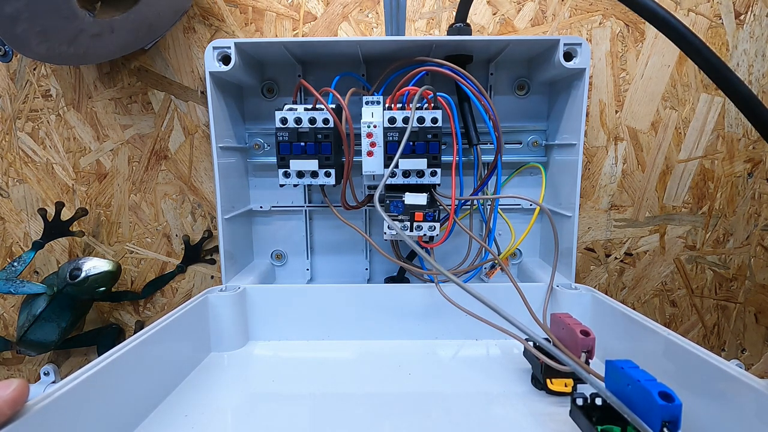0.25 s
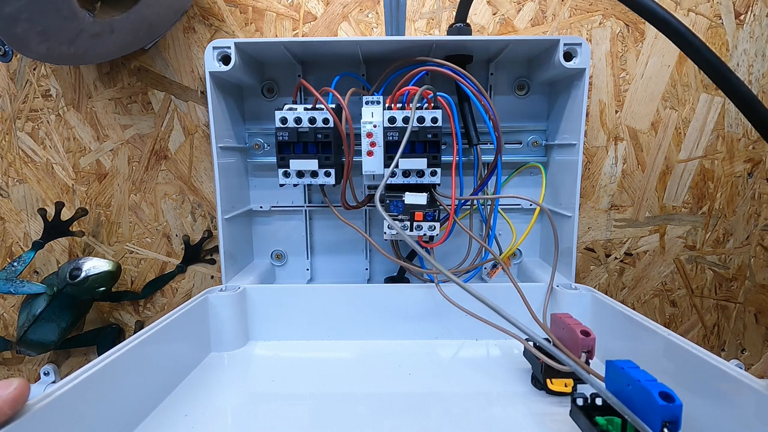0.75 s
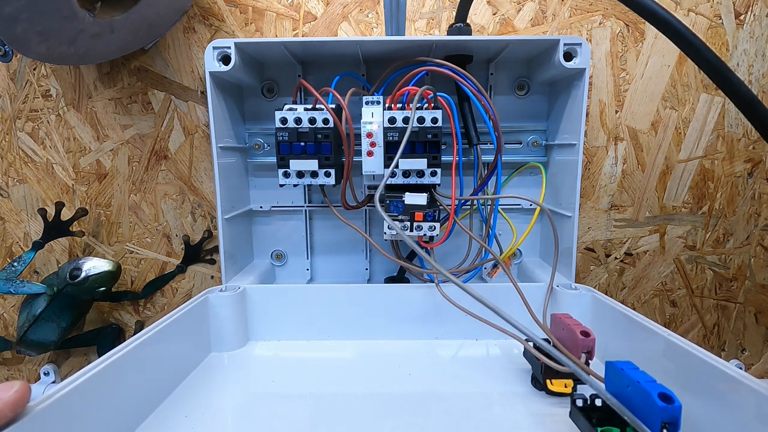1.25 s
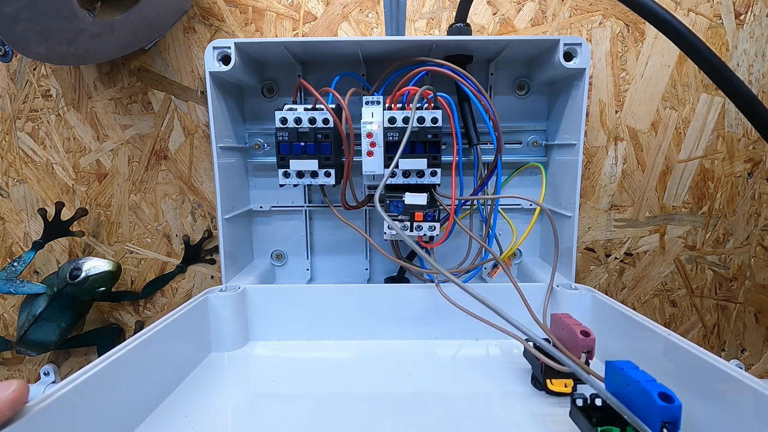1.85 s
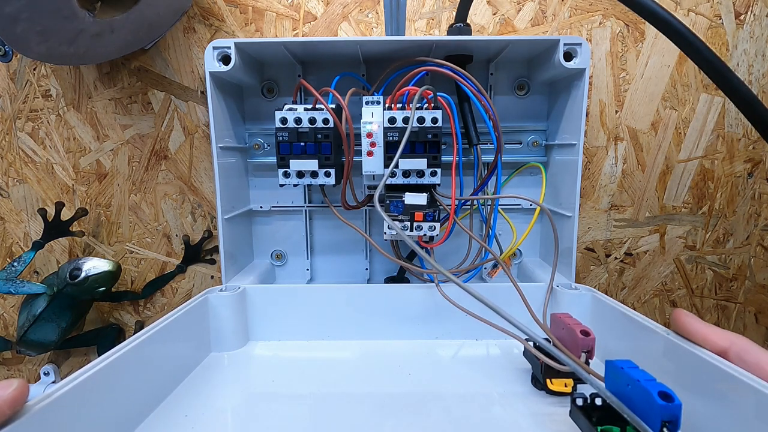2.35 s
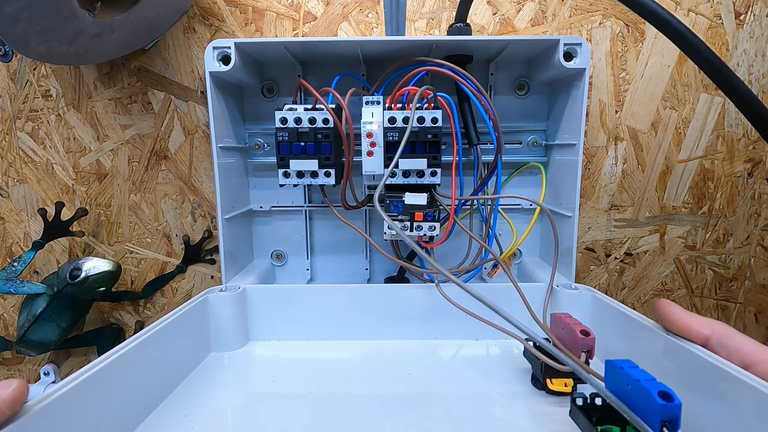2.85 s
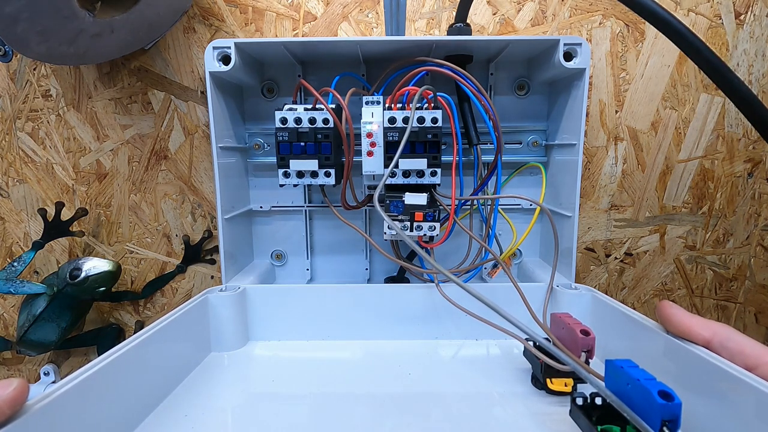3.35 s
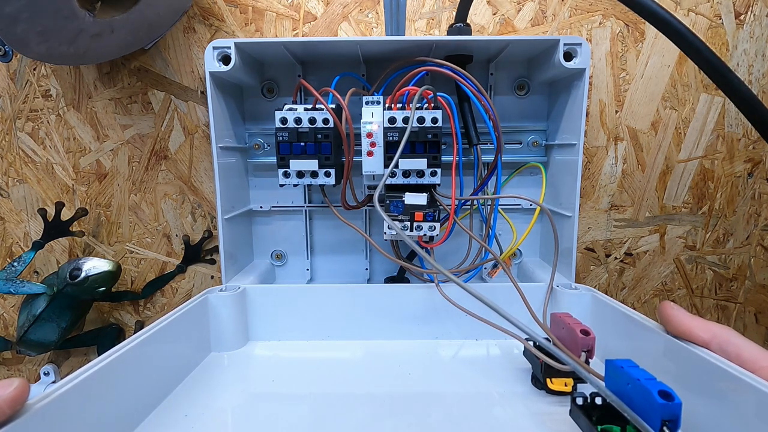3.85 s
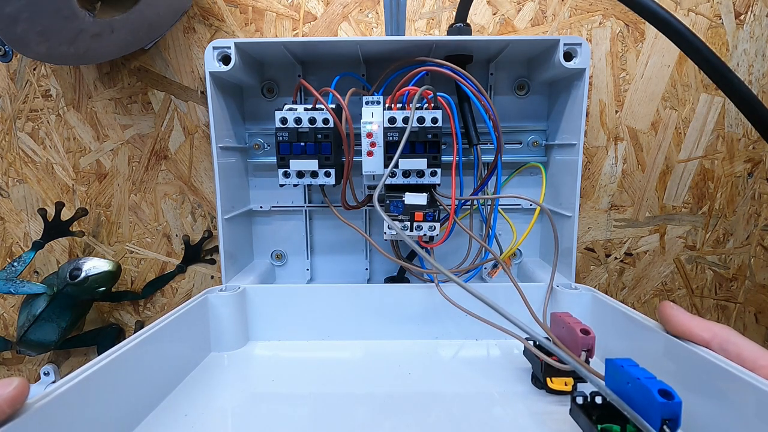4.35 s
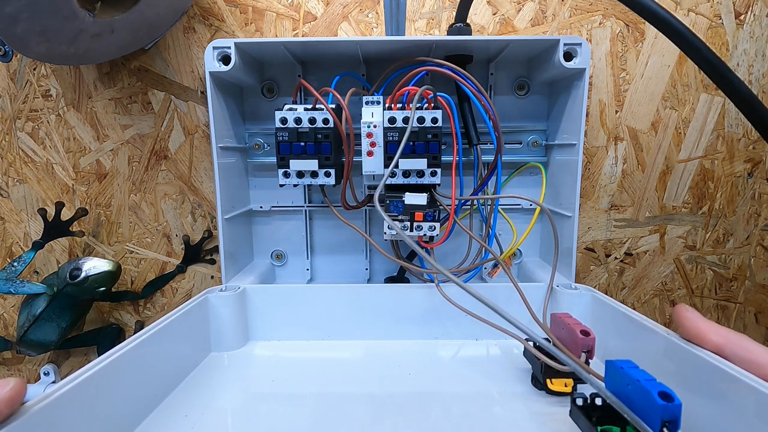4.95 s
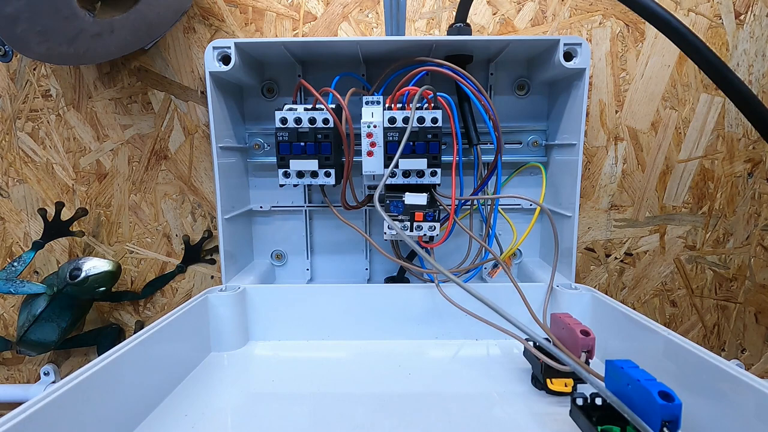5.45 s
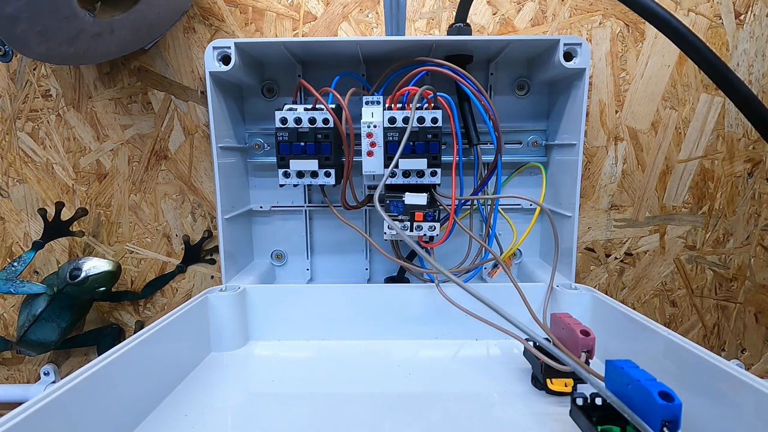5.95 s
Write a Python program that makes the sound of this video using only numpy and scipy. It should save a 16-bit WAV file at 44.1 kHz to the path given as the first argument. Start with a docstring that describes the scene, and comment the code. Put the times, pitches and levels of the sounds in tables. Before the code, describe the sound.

Faint room air, then a violent close double clack of switchgear that makes the box and wall boom. A motor jumps to full speed and drones evenly, its hum seeming to rise slightly after the clack as the recording level recovers. After several seconds the contactors snap open, the hum vanishes, plastic gets knocked, and bearings whir and ring while slowing, still turning at the end.

```python
"""Faint air in a workshop and a hand rustling on a plastic box; then two contactors clack shut on the wall.
They start a four-pole induction motor: summed sines hum on 50 Hz mains, repeated clicks and noise buzz,
and coloured noise makes the bearings rush, with a light swish once a turn. The contactors drop out as
decaying cracks and metal rings, a few knocks follow and the rotor coasts down, ringing its frame.
The loud clacks pull the recorder's gain down on the motor; set level curves let it recover."""
import sys
import numpy as np
from scipy import signal
from scipy.fft import rfft, irfft, next_fast_len
from scipy.io import wavfile
from scipy.ndimage import map_coordinates

SR = 44100
rng = np.random.default_rng(int(sys.argv[2]) if len(sys.argv) > 2 else 0)


def put_to_file(sound):
    """Save the sound as 16-bit audio at rate SR, in the file named by the first command-line argument."""
    columns = np.atleast_2d(sound).T  # one column per channel
    safe = np.clip(columns, -1, 1)
    whole_steps = np.round(safe * 32767)
    wavfile.write(sys.argv[1], SR, whole_steps.astype(np.int16))


N = 273007
T = np.arange(N) / SR  # s

MAINS_HZ, ROTOR_SLOTS = 50, 48
ON_S, OFF_S = 0.785, 4.512  # the motor gains and loses its power
# the recorder's gain, pulled down by the loud clack, recovers from this depth, time and over this span
DUCK_DB, RECOVERY_FROM_S, RECOVERY_S = -6, 1.21, 1.7

# rotor speed from standstill to coasting: (time [s], speed [turns per s])
SHAFT_SPEED = [(.77, 0), (.98, 24.86), (2.4, 24.879), (4.51, 24.879), (5.05, 17.94), (5.37, 16.1),
               (5.55, 14.9), (6.2, 10.0)]


def undb(db):
    """Decibels to gain."""
    return 10 ** (np.asarray(db) / 20)


def unit(x):
    """Scale to rms 1."""
    return x / np.sqrt(np.mean(x ** 2))


def curve(rows):
    """Rows of (time [s], value), joined by straight lines."""
    return np.interp(T, *np.transpose(rows))


def filtered(x, response):
    """Apply a frequency response, given as a function of Hz."""
    size = next_fast_len(N + SR // 2)
    f = np.maximum(np.fft.rfftfreq(size, 1 / SR), 1)
    return irfft(rfft(x, size) * response(f), size)[..., :N]


def colour(x, points, size=4096):
    """Minimum-phase filter through (frequency [Hz], level [dB]) points, with unit gain for white noise."""
    hz, db = np.transpose(points)
    f = np.maximum(np.fft.rfftfreq(size, 1 / SR), 1)
    gain = undb(np.interp(np.log(f), np.log(hz), db))
    # folding the cepstrum onto positive times makes the filter causal
    cepstrum = irfft(np.log(gain))
    cepstrum[1:size // 2] *= 2
    cepstrum[size // 2 + 1:] = 0
    h = irfft(np.exp(rfft(cepstrum)))
    return signal.oaconvolve(x, h / np.linalg.norm(h))[:N]


def noise():
    """White noise."""
    return rng.standard_normal(N)


def fade(t, t60):
    """Exponential decay by 60 dB in t60 seconds."""
    return np.exp(-np.log(1000) * t / max(t60, 1e-3))


def add(out, s, x):
    """Mix x in at time s."""
    i = int(s * SR)
    out[i:i + len(x)] += x[:N - i]


def pings(rows, rise_s):
    """Small metal parts ring freely after a touch, as decaying sines."""
    out, t = np.zeros(N), T[:SR]
    for s, hz, db, t60 in rows:
        envelope = fade(t, t60) * (1 - np.exp(-t / rise_s))
        add(out, s, undb(db) * envelope * np.sin(2 * np.pi * hz * t))
    return out


def gain_recovery():
    """The recorder's gain in dB, pulled down by the loud clack, recovers: the running motor is heard rising."""
    return DUCK_DB * np.clip(1 - (T - RECOVERY_FROM_S) / RECOVERY_S, 0, 1) ** 2


def air():
    """Steady coloured noise of the room, partly shared by the two microphone ports."""
    # (frequency [Hz], level [dB])
    air_colour = [(25, -5.5), (65, -12.5), (110, -19), (165, 0), (230, -5), (350, -5.5), (480, -11),
                  (800, -21.5), (1200, -18), (1900, -24), (2800, -28.5), (5200, -25.5), (9000, -35.5),
                  (15000, -54)]
    ports = np.array([colour(noise(), air_colour), colour(noise(), air_colour)])
    shared = ports.mean(axis=0)
    return (ports + shared) * undb([[-76], [-71.5]])  # left, right


def knocks(tail_t60=0.14, thud_t60=0.79, thud_rise_s=0.015):
    """Dull noise knocks on plastic, each with a low thud of the wall, after a faint rustle of handling."""
    # (time [s], level [dB], t60 [s], tail against the knock [dB], thud of the wall [dB])
    knock_rows = [(0.566, -63, .15, -12, -69), (1.221, -43, 0.032, -4.5, -63), (4.839, -51, 0.033, -3, -46),
                  (4.9, -42.5, 0.11, -15, -44.5), (4.923, -54, .04, -14, -57),
                  (5.006, -50.5, 0.045, -18, -67), (5.049, -34.5, 0.055, -2.5, -44)]
    # colour of a knock: (frequency [Hz], level [dB])
    knock_colour = [(60, -28.5), (130, -3), (230, -8), (550, -7), (900, 0.5), (1300, 9.5), (1500, -1.5),
                    (1900, -2.5), (2600, -15), (3400, -27.5), (4400, -30), (8000, -39), (14000, -57)]
    # colour of the thud under it: (frequency [Hz], level [dB])
    thud_colour = [(15, 2.5), (35, -2), (70, 0), (110, -17), (150, -3), (220, -2.5), (300, -18),
                   (700, -26.5), (2000, -74)]

    # a hand rustles on the box just before the start
    rustle_db, from_s, attack_s = -67, 0.33, 0.22
    taps = noise() * undb(rustle_db) * np.clip((T - from_s) / attack_s, 0, 1) * (T < ON_S)
    thuds, t = np.zeros(N), T[:SR]
    for s, db, t60, tail_db, thud_db in knock_rows:
        decay = fade(t, t60) + undb(tail_db) * fade(t, tail_t60)
        add(taps, s, undb(db) * rng.standard_normal(SR) * decay)
        swell = fade(t, thud_t60) * (1 - np.exp(-t / thud_rise_s))
        add(thuds, s, undb(thud_db) * rng.standard_normal(SR) * swell)
    return colour(taps, knock_colour) + colour(thuds, thud_colour)


def contactors(tail_db=-21, tail_t60=0.23, ring_db=-3, contact_s=0.0003):
    """Each blow is a dense crack that rings the metal parts and dies away in the box."""
    # a push-button click at 0.72 s, then armature and contact blows: # (time [s], level [dB], body against
    # middle [dB], treble against middle [dB], t60 [s])
    blows = [(0.72, -67, -23, 14, 0.12), (0.749, -42, -0.5, -10, 0.098), (0.76, -28.5, -3, -5, 0.12),
             (0.7701, -11.5, -8, 5.5, 0.056), (.773, -20, -1, -5, 0.03), (0.7841, -7.5, 3.5, -19, 0.019),
             (0.892, -31, 3, -5, 0.046), (0.907, -29, -11, -7, 0.015), (0.9097, -28, 4, 14.5, 0.026),
             (.918, -8.5, -1.5, -11, 0.032), (4.494, -24.5, -8, -24, 0.029), (4.5, -21, -13, 9.5, 0.025),
             (4.506, -6.5, 1.5, -12.5, 0.027), (4.51, -31, -37, -8.5, .025),
             (4.687, -44.5, 8.5, 1.5, 0.066), (4.837, -51.5, 9, 1, 0.066)]
    # colour of a clack: (frequency [Hz], level [dB])
    clack_colour = [(180, -24.5), (300, -4.5), (430, -24), (700, -5), (1300, -12.5), (1600, -1.5),
                    (2150, -15), (2560, -7), (2900, -8), (3700, -8.5), (4900, -9), (5800, -7.5),
                    (8400, -18.5), (12100, -25.5), (15500, -44)]
    # modes of contactors, rail and springs: (frequency [Hz], level [dB], t60 [s])
    metal_modes = [(665, -28, 0.086), (658, -18, 0.093), (896, -26, 0.23), (990, -18, 0.16),
                   (1510, -13, 0.09), (1725, -30, 0.3), (2230, -32.5, 0.17), (2385, -39.5, 0.55),
                   (3698, -45.5, 0.09), (5580, -35, 0.027), (6540, -7.5, 0.017)]

    body, middle, treble = np.zeros((3, N))
    t = T[:SR]
    for s, db, body_db, treble_db, t60 in blows:
        decay = fade(t, t60) + undb(tail_db) * fade(t, tail_t60)
        crack = rng.standard_normal(SR) * decay * (1 - np.exp(-t / contact_s))
        for band, gain_db in ((body, body_db), (middle, 0), (treble, treble_db)):
            add(band, s, undb(db + gain_db) * crack)

    # body gains act below 1700 Hz, treble gains above 6500 Hz
    low, high = (signal.butter(2, hz, fs=SR, output="sos") for hz in (1700, 6500))
    body_change = signal.sosfiltfilt(low, body - middle)
    treble_change = treble - middle - signal.sosfiltfilt(high, treble - middle)
    cracks = colour(middle + body_change + treble_change, clack_colour)

    rings = np.zeros(N)
    for s, db, body_db, _, _ in blows:
        for hz, mode_db, t60 in metal_modes:
            # the body level counts most for the low modes
            gain = undb(db + mode_db + ring_db + body_db / (1 + (hz / 2500) ** 2))
            add(rings, s, gain * fade(t, t60) * np.sin(2 * np.pi * hz * t))
    return cracks + rings


def bearings(turns, swish_db=0, swish_turn=0.31, swish_sharp=5.0):
    """Rolling balls hiss and ring the frame; something brushes lightly once a turn."""
    # colour of the rolling bearings: (frequency [Hz], level [dB])
    bearing_colour = [(30, -8), (90, -14), (160, -8), (300, -8), (480, -20), (750, -27), (950, -13),
                      (1400, -8), (1900, -4.5), (2300, -8.5), (2800, -11.5), (3700, -8.5), (4300, 2),
                      (5100, 0.5), (5800, -6.5), (7600, -7), (9500, -17.5), (12300, -24), (15000, -48.5)]
    # ringing of the motor frame: (frequency [Hz], half-width at -6 dB [Hz], level [dB])
    frame_modes = [(394, 20, 17), (1100, 43, 9.5), (1592, 69, 11), (1922, 60, 14), (2083, 41, 11),
                   (3120, 35, 4.5), (4800, 170, -2.5)]
    brush_colour = [(5000, -32.5), (7200, 1.5), (8100, 4.0), (9200, -12),
                    (10300, -9.5), (11200, -19.5), (12200, -7.5), (15000, -33.5)]  # Hz, dB
    # levels under power and while coasting
    rush_run_db, rush_coast_db, frame_run_db, frame_coast_db = -59.5, -62, -57, -53
    # the drop-out clack pulls the recorder's gain down; it recovers, while the frame ringing dies down
    duck_db, recovery_s, sag_db_per_s = -6, 0.8, 7

    def frame_response(f):
        return sum(undb(db) / (1 + .5j * (f / hz - hz / f) * hz / w) ** 2 for hz, w, db in frame_modes)

    rush = colour(noise(), bearing_colour)
    frame = unit(filtered(noise(), frame_response))
    brush = colour(noise(), brush_colour)
    brush *= np.exp(swish_sharp * (np.cos(2 * np.pi * (turns - swish_turn)) - 1))

    coasted = np.maximum(T - OFF_S, 0)
    duck = duck_db * np.clip(1 - coasted / recovery_s, 0, 1)
    rush_db = np.where(T < OFF_S, rush_run_db + gain_recovery(), rush_coast_db + duck)
    frame_off_db = frame_coast_db + duck - sag_db_per_s * coasted
    frame_db = np.where(T < OFF_S, frame_run_db + gain_recovery(), frame_off_db)
    return (rush + undb(swish_db) * brush) * undb(rush_db) + frame * undb(frame_db)


def panel(rise_s=0.014, rumble_db=-15, rumble_t60=0.78):
    """The jolted box and wall boom in their low modes and leave a soft rumble."""
    # jolts of the box on its wall: (time [s], level [dB], tilt about 100 Hz [dB per octave])
    jolts = [(0.771, -21, 6), (0.817, -16.5, -9), (0.915, -18, -10), (4.511, -19, -5)]
    # modes of the wall panel and box: (frequency [Hz], level [dB], t60 [s])
    panel_modes = [(51.15, -16.5, 0.69), (57.6, 3.5, 0.52), (108.6, 3, 0.27), (141.7, 6.5, 0.25),
                   (162, 15, 0.14), (210.5, 4.5, 0.25), (230.3, -15.5, 0.14), (358.4, -22, 0.264)]
    rumble_colour = [(20, -22.5), (45, -6.5), (90, 7.0), (180, 7.5),
                     (300, -16.0), (600, -21), (2000, -71)]  # Hz, dB

    booms, rumble, t = np.zeros(N), np.zeros(N), T[:2 * SR]
    for s, db, tilt_db in jolts:
        boom = np.zeros(len(t))
        for hz, mode_db, t60 in panel_modes:
            gain = undb(mode_db + tilt_db * np.log2(hz / 100))
            boom += gain * fade(t, t60) * np.sin(2 * np.pi * hz * t)
        add(booms, s, undb(db) * boom * (1 - np.exp(-t / rise_s)))
        add(rumble, s, undb(db + rumble_db) * fade(t, rumble_t60) * rng.standard_normal(len(t)))
    return booms + colour(rumble, rumble_colour)


def rattle(phase, size, t60):
    """A short dispersed click with a flat spectrum, played once per cycle of the phase."""
    spectrum = rfft(rng.standard_normal(size) * fade(T[:size], t60))
    click = irfft(spectrum / np.abs(spectrum), size)
    return unit(map_coordinates(click, [phase % 1 * size], order=3, mode="grid-wrap"))


def magnetism(turns, buzz_db=-32, wobble_db=-2, spit_db=-38, inrush_db=4, release_t60=0.055):
    """The field pulls the iron twice a mains cycle; laminations buzz and rotor slots beat against the hum."""
    # tones of the stator and its feet: (multiple of the mains, level [dB])
    stator_tones = [(1, -49), (1.5, -33), (2, 3), (2.5, -10), (4, -14.5), (4.5, -49.5), (6, -17.5),
                    (8, -24), (10, -34), (12, -54)]
    # colour of the magnetic buzz: (frequency [Hz], level [dB])
    buzz_colour = [(350, -46.5), (600, -3), (740, -21), (1000, -1.5), (1300, 2), (1450, -10.5), (1700, -5),
                   (2250, -15.5), (2500, -6), (3300, -13.5), (3580, -1.5), (3850, -16), (4700, -12.5),
                   (5900, -20.5), (7300, -20), (9200, -31.5), (12000, -47.5), (15000, -54)]
    hum_db, slot_db, partner_db = -22.5, -35.3, -33.8
    beat_crest_s = 3.895  # the slot tone and its mains harmonic swell together here

    cycles = MAINS_HZ * (T - beat_crest_s)
    tones = sum(undb(db) * np.sin(2 * np.pi * (k * cycles + rng.random())) for k, db in stator_tones)
    # the rotor slips behind the field, so its slot tone lies a few Hz under a mains harmonic
    slots = ROTOR_SLOTS * (turns - np.interp(0, cycles, turns))
    tones += undb(slot_db) * np.sin(2 * np.pi * slots)
    tones += undb(partner_db) * np.sin(2 * np.pi * ROTOR_SLOTS / 2 * cycles)

    # the same rattle at every pull, and another at every turn of the rotor
    pull, turn = SR // (2 * MAINS_HZ), 2 * SR // MAINS_HZ  # samples
    rattles = rattle(2 * cycles, pull, t60=0.044) + undb(wobble_db) * rattle(turns, turn, t60=0.29)
    # fresh noise that decays within each pull
    spit = unit(noise() * np.resize(fade(T[:pull], 0.087), N))
    buzz = colour(undb(buzz_db) * rattles + undb(spit_db) * spit, buzz_colour)
    # a notch lets the whine stand clear of the buzz
    whine_hz = ROTOR_SLOTS / 2 * MAINS_HZ
    buzz = filtered(buzz, lambda f: 1 - np.exp(-((f - whine_hz) / MAINS_HZ) ** 2))

    power = np.clip((T - ON_S) / 0.072, 0, 1) * fade(np.maximum(T - OFF_S, 0), release_t60)
    # the starting motor is louder until it is up to speed
    inrush = inrush_db * np.clip((RECOVERY_FROM_S - T) / 0.24, 0, 1)
    return (np.sqrt(2) * tones + buzz) * power * undb(hum_db + gain_recovery() + inrush)


def drone(turns, grumble_db=-49, release_t60=1.0, tone_t60=0.39):
    """The fifteenth shaft order drives the lowest frame mode in slow swells over a low grumble."""
    drone_db, swell_db, period_s, crest_s = -46.5, 3, 1.03, 3.206
    grumble_colour = [(30, 4.5), (120, 5.5), (250, 4.0), (400, 2.5),
                      (520, -8.5), (750, -17.0), (2000, -46)]  # Hz, dB

    # slow noise makes the phase of the tone wander
    waver = unit(filtered(noise(), lambda f: 1 / (1 + (f / 5) ** 2) ** 2))
    tone = np.sqrt(2) * np.sin(2 * np.pi * 15 * turns + waver / 2)
    swell = swell_db * np.cos(2 * np.pi * (T - crest_s) / period_s)
    tone_db = drone_db + gain_recovery() + swell
    grumble = colour(noise(), grumble_colour)
    coasted = np.maximum(T - OFF_S, 0)
    running = np.clip((T - ON_S) / 0.018, 0, 1) * fade(coasted, release_t60)
    return running * (tone * undb(tone_db) * fade(coasted, tone_t60) + grumble * undb(grumble_db))


def springs():
    """Return springs ring when an armature moves, longest after the contactors open."""
    # (time [s], frequency [Hz], level [dB], t60 [s])
    spring_rings = [(.893, 2280, -31, .06), (4.508, 4680, -35, 0.27), (4.509, 4615, -37, .24),
                    (4.585, 984, -45.5, 0.55)]
    return pings(spring_rings, rise_s=0.0036)


def coasting(mode_hz=376, width_hz=22.0, sag_hz_per_s=4):
    """The frame rings at its own slowly sagging pitch and swells as each shaft order falls through it."""
    # shaft orders that sweep through the lowest frame mode: (multiple of the shaft speed, level [dB])
    sweeps = [(19, -56), (22, -61), (24, -53.5), (27, -62.5), (31, -63), (35, -69.5)]
    speed = curve(SHAFT_SPEED)
    swell = sum(undb(db) / (1 + (2 * (k * speed - mode_hz) / width_hz) ** 4) for k, db in sweeps)
    # the pitch reaches mode_hz half a second before the end
    hz = mode_hz + sag_hz_per_s * (T[-1] - T - .5)
    return np.sqrt(2) * np.sin(2 * np.pi * np.cumsum(hz) / SR) * swell * (T > OFF_S)


def bench(rumble_db=-45, attack_s=0.25, hold_s=0.24, t60=1.36):
    """The bench rumbles for a moment, as low noise, when the motor loses its drive."""
    # (frequency [Hz], level [dB])
    bench_colour = [(15, 4), (35, 9.5), (70, -11), (120, -19), (400, -56.5)]
    since = T - OFF_S
    envelope = np.clip(since / attack_s, 0, 1) * fade(np.maximum(since - hold_s, 0), t60)
    return colour(noise(), bench_colour) * undb(rumble_db) * envelope


def tick():
    """A small tick in the motor frame rings two short modes."""
    # (time [s], frequency [Hz], level [dB], t60 [s])
    tick_rings = [(6.0965, 1750, -42.5, 0.018), (6.0965, 1940, -44, 0.024)]
    return pings(tick_rings, rise_s=0.00083)


def stereo(x, side_db, lean_db, lag_rad):
    """Sound reaches the right port a little sooner; reflections differ between ports, most in the treble."""
    t = T[:SR // 4]
    walls = rng.standard_normal(len(t)) * fade(t, 0.25)
    side = signal.oaconvolve(x, walls / np.linalg.norm(walls))[:N]
    side = filtered(side, lambda f: undb(side_db) * (0.015 + f / (f + 3000) + (f / 12000) ** 2))
    # lean (positive to the left) and lag are strongest at 2300 Hz
    lean = undb(lean_db / 2) - 1 - .5j * lag_rad
    side += filtered(x, lambda f: lean * 2 / (f / 2300 + 2300 / f))
    return np.array([x + side, x - side])


def scene():
    """Motor, control box and room air together at a two-port microphone."""
    turns = np.cumsum(curve(SHAFT_SPEED)) / SR
    spinning = np.clip(turns, 0, 1)  # fades in over the first turn
    rotor = spinning * (bearings(turns) + drone(turns) + coasting())
    motor = magnetism(turns) + rotor + tick() + bench()
    box = contactors() + springs() + panel() + knocks()
    motor_stereo = stereo(motor, side_db=-10.0, lean_db=0.9, lag_rad=0.8)
    box_stereo = stereo(box, side_db=-16.5, lean_db=-1.2, lag_rad=0.68)
    return motor_stereo + box_stereo + air()


def record(dry):
    """The recorder rounds the highest peaks and cuts the top."""
    rounded = dry / (1 + (dry / .9) ** 4) ** .25
    top_cut = signal.ellip(10, .2, 80, 15800, fs=SR, output="sos")  # low-pass at 15800 Hz
    return signal.sosfilt(top_cut, rounded)


dry = scene()
out = record(dry)
put_to_file(out)
```